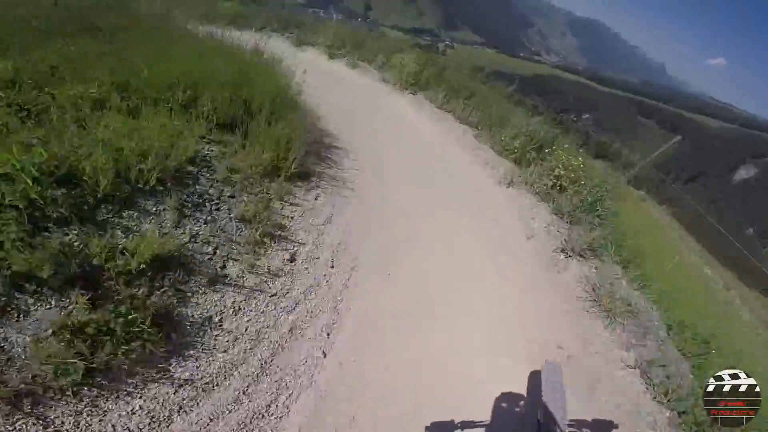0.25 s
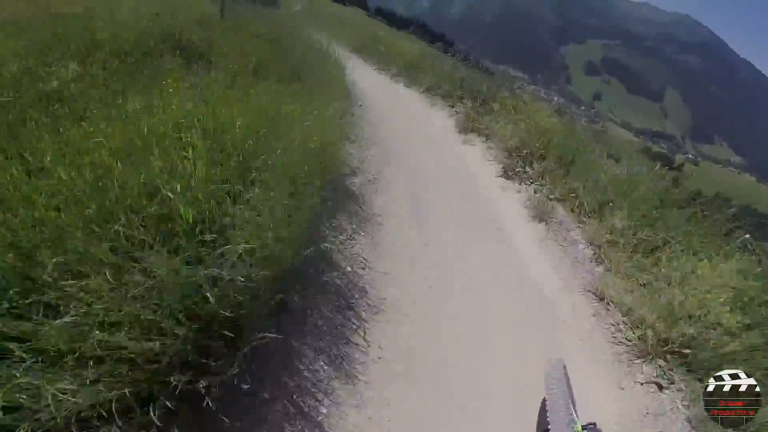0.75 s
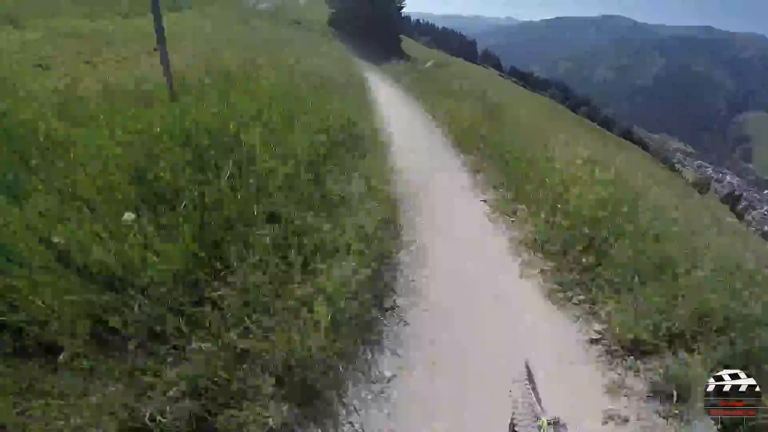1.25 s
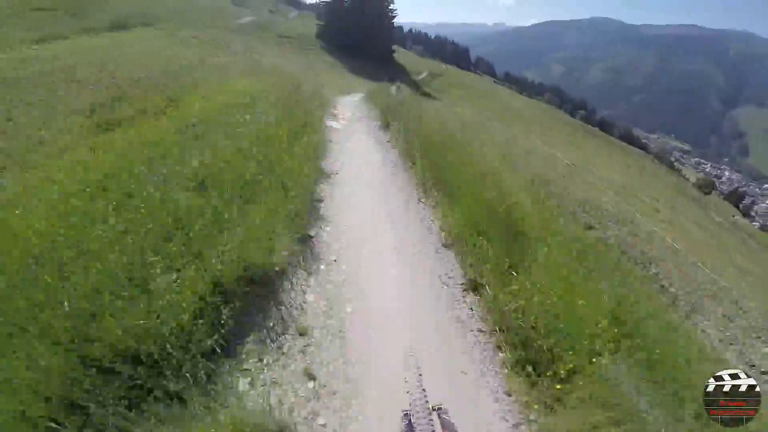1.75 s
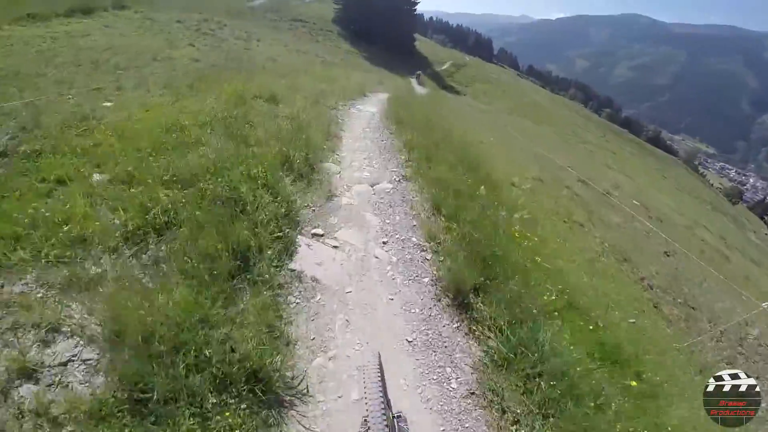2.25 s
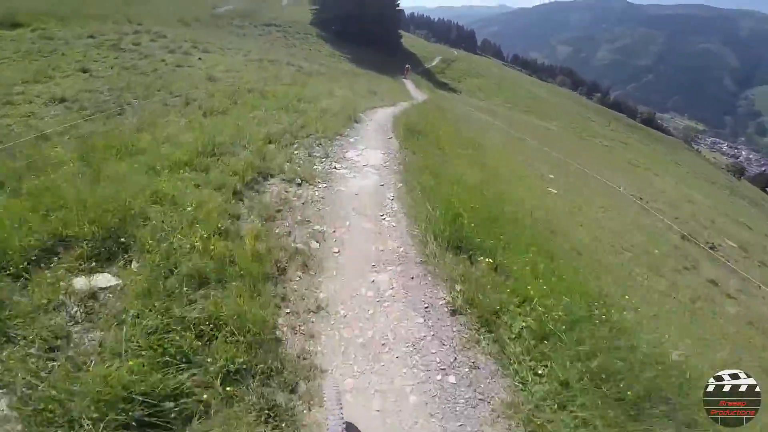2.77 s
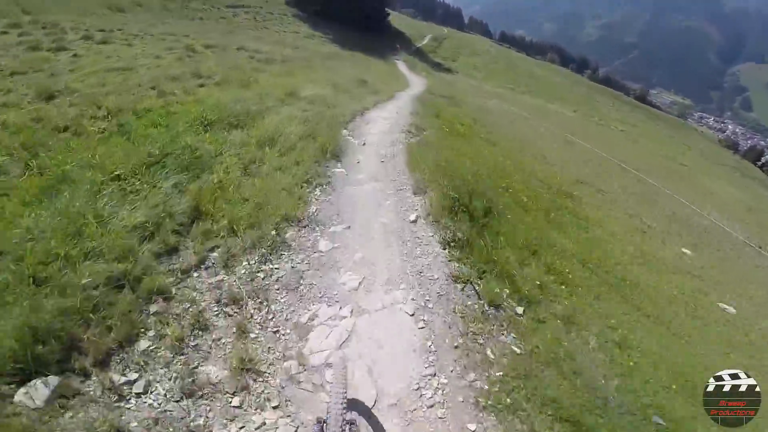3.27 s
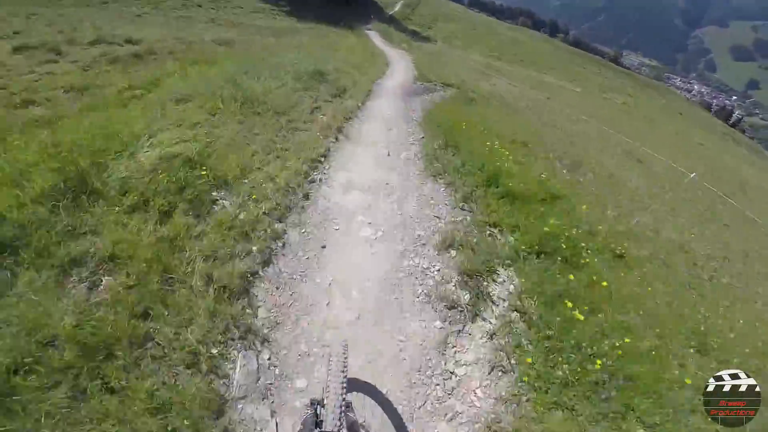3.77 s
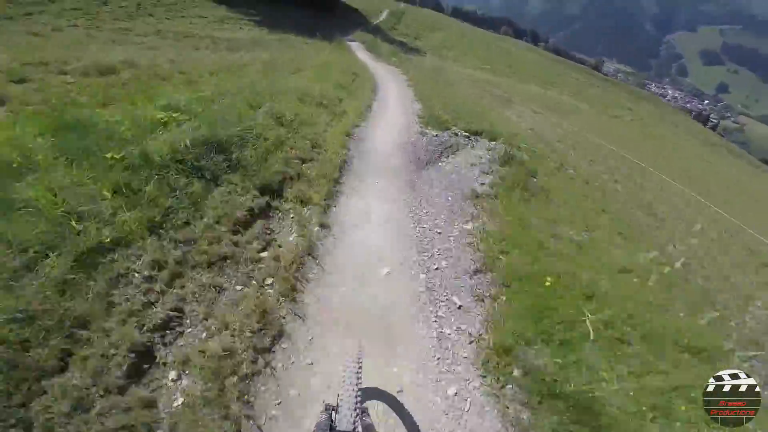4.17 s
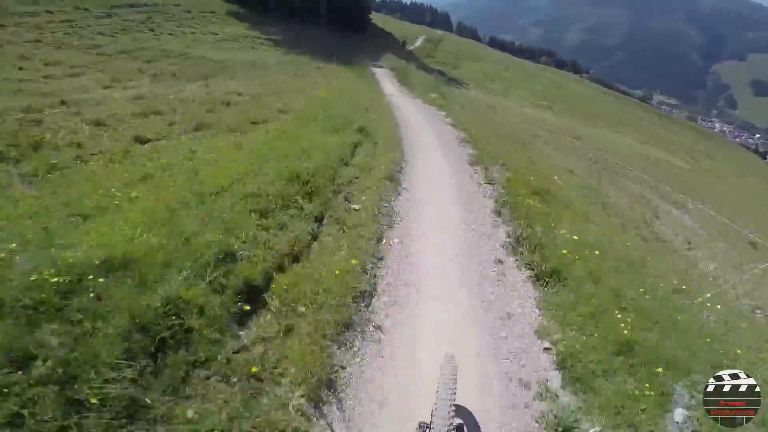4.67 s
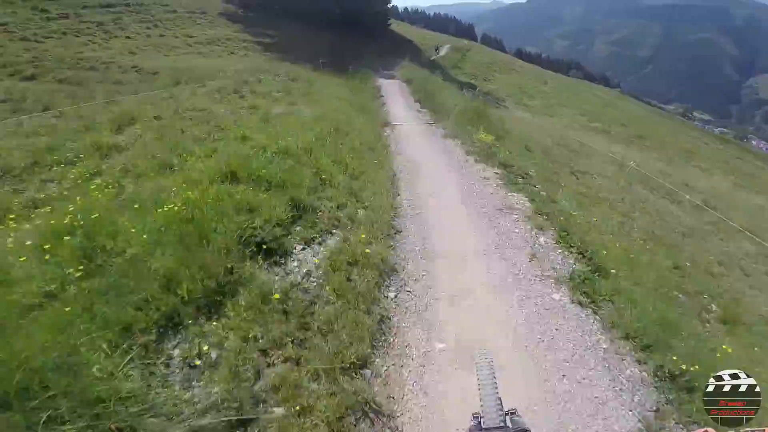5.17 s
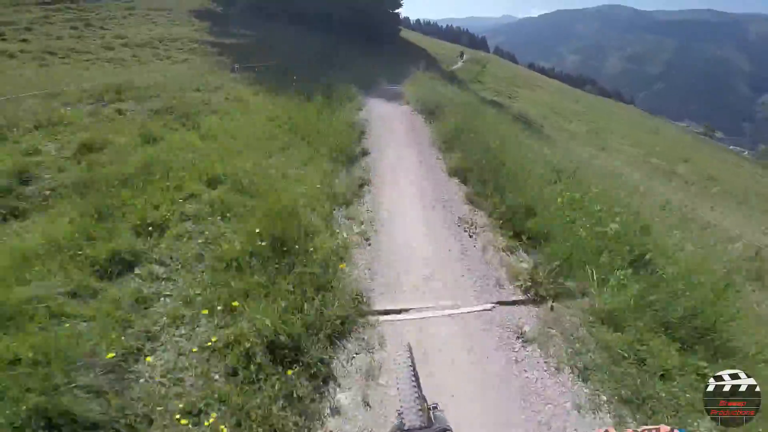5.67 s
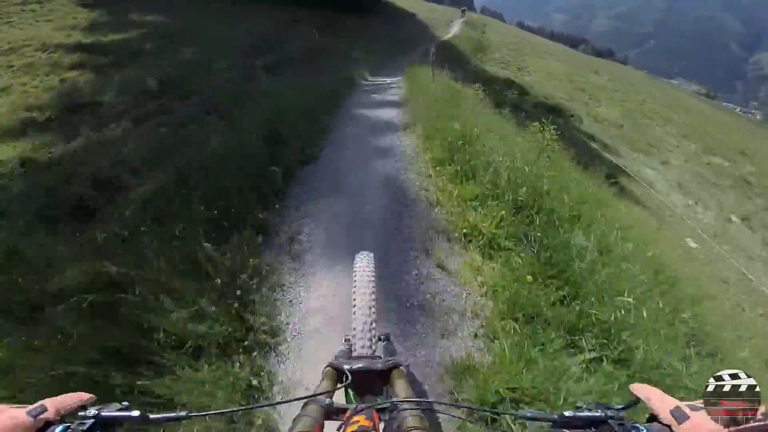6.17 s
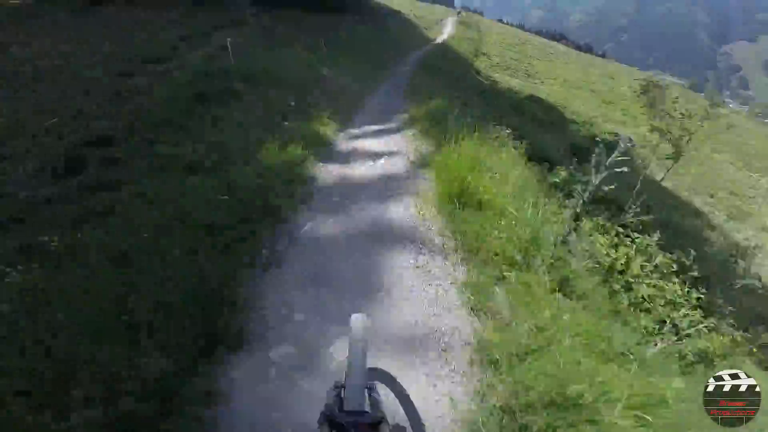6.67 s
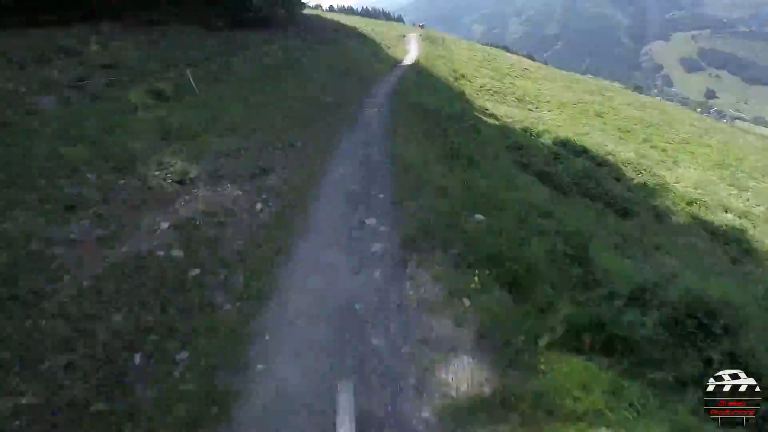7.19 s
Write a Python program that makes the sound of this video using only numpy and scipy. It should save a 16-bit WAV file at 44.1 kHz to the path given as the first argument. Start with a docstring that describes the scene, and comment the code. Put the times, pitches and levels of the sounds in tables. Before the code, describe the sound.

A mountain bike rolls quickly downhill on an open gravel path, heard close from the rider, with low wind buffeting loudest throughout. Strong flapping blasts come early, then the tyres drone briefly on hard ground. Stones knock the wheels and ping off the spokes while chain and cables click on the frame. A faint freehub buzz and steady gravel crunch run underneath, and one hard hit cracks shortly before the end.

```python
"""Wind rumbles and tears at a microphone on the rider as a mountain bike coasts fast down gravel.
Close below, the tyres hiss and crunch and briefly drone on hardpack; stones knock, crack and ping,
chain and cables click on the frame, and faint squeaks come in runs. The freehub's pawls buzz with
the wheel speed and fall silent for a moment after the bend."""
import sys
import numpy as np
from scipy import signal
from scipy.fft import rfft, irfft, next_fast_len
from scipy.io import wavfile
from scipy.ndimage import uniform_filter1d

SR = 44100
rng = np.random.default_rng(int(sys.argv[2]) if len(sys.argv) > 2 else 0)


def to_wav(s):
    """Save 16-bit WAV."""
    ch = np.atleast_2d(s).T  # columns
    pcm = np.round(np.clip(ch, -1, 1) * 32767)  # PCM
    wavfile.write(sys.argv[1], SR, pcm.astype(np.int16))


N = 327645
TIME = np.arange(N) / SR

# Levels in the tables are relative: the functions add their own gains.
# Head wind between blasts. Each row: time in seconds, large eddies in dB, turbulence in dB.
HEAD_WIND = [(0, -26, -33.5), (0.11, -29, -43), (0.17, -17.5, -30), (0.62, -22.5, -39), (1.0, -19, -34),
             (1.68, -16.5, -29.5), (1.82, -27.5, -39), (2.2, -22, -34), (2.9, -15.5, -29),
             (3.08, -19.5, -29), (3.3, -18.5, -33), (3.78, -16, -31.5), (3.97, -21.5, -34.5),
             (4.6, -16, -23), (5.05, -18.5, -31), (5.85, -17, -28), (6.28, -24.5, -40), (6.5, -16.5, -37),
             (6.77, -24, -39.5), (7.43, -18.5, -30)]
# Blasts breaking over the microphone. Each row: start and length in seconds, buffet and tear in dB.
WIND_BLASTS = [(0.155, 0.12, -23.5, -53), (0.27, 0.035, -20, -29.5), (0.345, 0.081, -16, -26),
               (0.56, 0.04, -23.5, -44), (0.69, 0.075, -19.5, -35), (0.79, 0.08, -23.5, -30.5),
               (0.905, 0.062, -18.5, -23.5), (0.985, 0.19, -21, -22), (1.19, 0.037, -24.5, -25.5),
               (1.292, 0.018, -22, -22), (1.33, 0.052, -26, -24.5), (1.455, 0.26, -28, -32.5),
               (2.285, 0.047, -22, -26.5), (3.875, 0.03, -20, -36.5), (4.03, 0.037, -22.5, -39.5),
               (4.187, 0.11, -26.5, -29), (4.355, 0.22, -41, -35.5), (5.19, 0.032, -23, -36.5),
               (5.29, 0.15, -24, -35), (5.735, 0.098, -24.5, -33), (6.535, 0.099, -19.5, -30),
               (6.666, 0.008, -15.5, -26), (7.005, 0.077, -21.5, -29), (7.215, 0.12, -21, -55)]
# Sudden gusts, from dull thumps to chirring flaps.
# Each row: middle in seconds, level in dB, pitch in Hz, half-length in seconds.
SUDDEN_GUSTS = [(0.16, -13, 101, 0.016), (0.195, -25, 404, 0.027), (0.358, -23.5, 624, 0.013),
                (0.411, -21.5, 620, 0.0048), (0.414, -15.5, 272, 0.012), (0.692, -14, 88.4, 0.016),
                (0.795, -15, 226, 0.0056), (0.944, -24, 746, 0.0045), (0.993, -27, 1104, 0.019),
                (1.033, -25, 800, 0.0046), (1.047, -42, 2350, 0.05), (1.138, -29.5, 997, 0.032),
                (1.288, -25, 1000, 0.0029), (1.2956, -12, 870, 0.0023), (1.299, -7.5, 383, 0.0035),
                (1.315, -13.5, 375, 0.011), (1.55, -26.5, 674, 0.007), (1.593, -14.5, 72, 0.019),
                (1.644, -26, 593, 0.0098), (1.665, -27, 618, 0.02), (2.293, -24.5, 640, 0.025),
                (2.317, -22, 384, 0.02), (2.338, -30, 806, 0.0097), (2.443, -37, 764, 0.0039),
                (2.635, -27.5, 454, 0.0049), (2.64, -30, 950, 0.005), (2.872, -14, 98, 0.016),
                (3.649, -41, 760, 0.019), (3.884, -13, 135, 0.009), (3.919, -11, 111, 0.011),
                (4.033, -10, 42, 0.029), (4.191, -11, 39, 0.028), (4.206, -27.5, 910, 0.0057),
                (4.363, -9, 68.6, 0.021), (5.298, -8.5, 71.8, 0.022), (5.741, -25, 580, 0.012),
                (5.76, -22.5, 765, 0.0028), (5.765, -27, 1230, 0.0064), (6.595, -21, 660, 0.0027),
                (6.669, -12, 81.4, 0.015), (6.67, -26, 1030, 0.016), (6.978, -21.5, 1026, 0.0073),
                (6.991, -28.5, 1040, 0.0026), (7.057, -11.5, 47.8, 0.033)]
# Tyres on gravel, louder when pressed into bends and dips. Each row: time in seconds, level in dB.
TYRE_LEVEL = [(0, -48), (0.3, -53.5), (0.58, -47.5), (1.12, -45.5), (1.34, -48.5), (2.0, -50.5),
              (2.45, -49.5), (2.54, -51.5), (3.3, -50.5), (3.62, -46), (3.9, -49), (5.34, -45.5),
              (5.59, -49), (5.92, -44.5), (6.1, -50), (6.48, -54), (6.66, -44.5), (6.93, -50.5),
              (7.33, -40), (7.43, -45.5)]
# Smooth, hard ground. Each row: start in seconds, length in seconds, drone level in dB.
HARD_GROUND = [(1.78, 0.53, -33.5)]
# Chain and cables on the frame. Each row: start in seconds, level in dB, frame ring offset in dB.
CHAIN_CLICKS = [(0.963, -41, -10), (1.074, -43, -3), (1.164, -53, 28.5), (1.31, -53, 29.5),
                (1.729, -42, -12), (1.8697, -45, 4), (2.0383, -51, -10), (2.124, -52, -12), (2.694, -43, 5),
                (3.429, -41.5, -3), (3.478, -42.5, 8), (3.539, -56, -11), (3.581, -44, 7),
                (3.6123, -47, 11), (3.738, -47, 4), (3.8097, -46.5, 5), (3.845, -48, 12), (4.169, -41.5, 1),
                (4.3137, -45, 10), (5.968, -49, -8), (6.124, -45.5, -21), (6.542, -32.5, 5), (6.58, -38, 5),
                (6.606, -40.5, 11), (6.6273, -44, 8), (6.805, -46.5, -14)]
# Stones and ruts knocking the wheels. Each row: start in seconds, level in dB.
WHEEL_KNOCKS = [(1.684, -35), (1.796, -30.5), (2.3687, -49), (2.574, -39), (2.85, -38), (3.3324, -34),
                (3.4145, -34.5), (3.47, -31.5), (3.512, -33.5), (3.7365, -35), (3.894, -34), (3.956, -33.5),
                (4.824, -36), (4.8587, -35), (4.8825, -33), (5.3309, -33), (6.027, -33.5), (6.528, -27.5),
                (6.667, -35), (7.1928, -32)]
# Sharp cracks: the snap of the strongest gust, and hard hits on the wheels.
# Each row: start in seconds, level in dB.
SHARP_CRACKS = [(1.296, -24.5), (1.299, -27), (5.8008, -36), (6.5379, -20.5)]
# Stones flicked against spokes and frame. Each row: start in seconds, level in dB, pitch in Hz.
STONE_PINGS = [(2.3265, -46.5, 12000), (2.8226, -53, 6550), (3.3614, -54, 6200), (3.54, -43, 7030),
               (3.6125, -47, 7850), (3.669, -50, 7600), (3.712, -49, 7100), (3.8795, -48, 7450),
               (4.087, -48, 6100), (4.2425, -48, 6900)]
# Wheel speed as heard in the freehub. Each row: time in seconds, pawl clicks per second.
HUB_RATE = [(0, 71), (1.1, 75), (1.5, 79), (2.3, 51), (3, 55), (3.5, 61), (4, 69), (5, 74), (6.3, 97),
            (7.43, 103)]
# Buzz of the freehub. Each row: time in seconds, level in dB.
HUB_LEVEL = [(0, -58), (1.45, -57), (2.35, -62.5), (4.03, -60), (6.1, -65.5), (6.21, -54), (7.12, -64.5),
             (7.43, -64)]
# Runs of faint squeaking. Each row: start in seconds, length in seconds, level in dB.
SQUEAK_RUNS = [(2.6, 0.9, -58), (3.75, 0.45, -57), (5.85, 0.55, -57.5)]
# Spectra of the wind, the ground and the bike's parts. Each row: frequency in Hz, density in dB.
RUMBLE_SPECTRUM = [(8, -28), (20, -3.5), (32, 1.5), (55, -3.5), (80, -8), (120, -20), (250, -36.5),
                   (600, -82)]
BUFFET_SPECTRUM = [(40, -1), (80, -0.5), (115, 1.5), (170, -4), (260, -8.5), (400, -19.5), (800, -32.5),
                   (2500, -62)]
TEAR_SPECTRUM = [(120, -55), (260, 4.5), (360, 4), (550, -1.5), (850, -13.5), (1300, -19), (2500, -40),
                 (6000, -61)]
RASP_SPECTRUM = [(400, 15), (900, 13), (1500, -0.5), (2700, -6.5), (4000, -28), (8000, -68)]
GRAVEL_SPECTRUM = [(150, -20), (400, 8.5), (800, 7.5), (1300, 2.5), (2300, 0.5), (3000, -4.5), (4000, -8),
                   (5200, -14.5), (7000, -19), (9000, -24), (12000, -23), (15500, -34)]
STEEL_SPECTRUM = [(2000, -27), (4400, 4.5), (5200, 5), (6000, 3.5), (6900, 5), (7400, -3), (7800, 2),
                  (8800, -2), (11000, 0.5), (13500, 0), (15500, -6)]
FRAME_SPECTRUM = [(800, -42), (2200, 17), (3500, 10), (6500, -19.5), (9000, -19), (15000, -32)]
KNOCK_SPECTRUM = [(300, -1.5), (900, 12), (1700, 9.5), (2300, 8), (3200, -2.5), (5000, -14), (8000, -22),
                  (15000, -27)]
PAWL_SPECTRUM = [(2000, -50), (4500, -16), (5180, -9), (5700, -16.5), (8700, -16.5), (10000, -14.5),
                 (12200, -13.5), (12900, -2.5), (13450, -2), (14200, -16), (15500, -12)]


def wind(level_db=-1, rasp_db=-39, lump_db=4, heave_db=1.5, attack_s=0.016, release_s=0.015):
    """Large eddies push on the microphone port; small ones break off their crests and rasp when strong."""
    turbulence_db = follow(HEAD_WIND, column=2)
    buffet_blast = swells(WIND_BLASTS, attack_s, release_s)
    tear_blast = swells(WIND_BLASTS, attack_s, release_s, column=3)
    eddy_gain = np.hypot(amp(follow(HEAD_WIND) + heave_db * flutter(14)), buffet_blast)
    buffet_gain = np.hypot(amp(turbulence_db), buffet_blast)
    faint_tear_db = -48 + 0.99 * (turbulence_db + 31.5)  # the head wind tears more as it grows turbulent
    tear_gain = np.hypot(amp(faint_tear_db), tear_blast)
    rasp_gain = amp(rasp_db) * (tear_gain / amp(-27)) ** 2.28  # climbs steeply in strong flow
    eddies = steady(noise(RUMBLE_SPECTRUM), size=2800)
    crests = np.sqrt(0.31 + 0.69 * eddies ** 2)
    buffet = steady(noise(BUFFET_SPECTRUM) * crests, size=2000)
    tear = steady(noise(TEAR_SPECTRUM) * crests * amp(lump_db * flutter(25)), size=1600)
    rasp = steady(noise(RASP_SPECTRUM) * crests * amp(lump_db * flutter(110)), size=1600)
    body = eddies * eddy_gain + buffet * buffet_gain + tear * tear_gain
    return amp(level_db) * body + rasp * rasp_gain


def gusts(level_db=-1, wander=0.13, rise=0.15, width_octaves=0.36, size=6000):
    """Each gust sheds a quickening run of vortices at the microphone; longer runs break up more."""
    out = np.zeros(N)
    t = (np.arange(size) - size / 2) / SR
    bin_hz = np.fft.rfftfreq(size, 1 / SR) + 1
    for middle, db, hz, half_length in SUDDEN_GUSTS:
        jitter, spray = rng.standard_normal((2, size))
        drift = unit(signal.fftconvolve(jitter, signal.windows.hann(int(2 * SR / hz)), "same"))
        shedding_hz = hz * (1 + wander * drift + rise * np.tanh(t / half_length))
        phase = 2 * np.pi * np.cumsum(shedding_hz) / SR
        phase -= phase[size // 2]  # the hardest push comes in the middle
        steepness = 0.36 / (1 + (hz / 300) ** 2)  # large, slow vortices have the steepest crests
        vortices = unit(sum(steepness ** k * np.cos((k + 1) * phase) for k in range(4)))
        band = np.exp(-0.5 * (np.log2(bin_hz / hz) / width_octaves) ** 2)
        broken = unit(irfft(rfft(spray) * band, size))
        swell = np.exp(-2 * (t / half_length) ** 2)
        gust = swell * (vortices + np.sqrt(hz * half_length / 6) * broken)  # equal parts at six cycles
        gust *= np.linalg.norm(swell) / np.linalg.norm(gust)
        add(out, middle + t[0], amp(db + level_db) * gust)
    return out


def tyres(hiss_db=1.15, crunch_db=-3.5, bump_db=1.56):
    """Below the rider, knobs crush fine grit while bumps vary the load."""
    load = amp(bump_db * flutter(46))
    crunch = unit(colour(grains(per_s=1100, spread_db=5.5), GRAVEL_SPECTRUM))
    hiss = noise(GRAVEL_SPECTRUM)
    return (amp(hiss_db) * hiss + amp(crunch_db) * crunch) * load * amp(follow(TYRE_LEVEL))


def tread(drone_hz=140, waver=0.213, uneven_db=2):
    """The knobs slap the hard ground in a low, unsteady drone."""
    phase = 2 * np.pi * np.cumsum(drone_hz * (1 + waver * flutter(44.6))) / SR
    drone = unit(np.sin(phase) * amp(uneven_db * flutter(25)))
    return drone * swells(HARD_GROUND, attack_s=0.086, release_s=0.08)


def rattle(click_db=-4, frame_db=-8, knock_db=-4):
    """Steel clicks, the frame rings duller, the wheels knock; hard hits and the strongest gust crack."""
    out = np.zeros(N)
    for start, db, ring_db in CHAIN_CLICKS:
        add(out, start, amp(db + click_db) * strike(STEEL_SPECTRUM, rise_s=0.0025, t60_s=0.03))
        frame_ring = strike(FRAME_SPECTRUM, rise_s=0.0013, t60_s=0.051)
        add(out, start, amp(db + ring_db + frame_db) * frame_ring)
    for start, db in WHEEL_KNOCKS:
        add(out, start, amp(db + knock_db) * strike(KNOCK_SPECTRUM, rise_s=0.002, t60_s=0.042))
    for start, db in SHARP_CRACKS:
        add(out, start, amp(db) * strike(KNOCK_SPECTRUM, rise_s=0.00034, t60_s=0.008))
    return out


def stone_pings(ring_db=-3, tick_db=-5, t60_s=0.047):
    """A stone gives a sharp tick, and the part it hits rings briefly at its own pitch."""
    out = np.zeros(N)
    for start, db, hz in STONE_PINGS:
        tick = strike([(hz / 4, -9), (hz, 0), (2 * hz, -13)], rise_s=0.0008, t60_s=0.046)
        t = np.arange(len(tick)) / SR
        ring = np.sin(2 * np.pi * hz * t) * amp(-60 * t / t60_s)
        add(out, start, amp(db + ring_db) * ring + amp(db + tick_db) * tick)
    return out


def freehub(ring_s=0.0052, uneven_db=2, fades_at_s=1.46, resumes_s=2.32, fade_db_per_s=49):
    """A pawl drops off each tooth and chatters in the hub; the buzz fades once and snaps back."""
    rate = follow(HUB_RATE)
    teeth_passed = np.cumsum(rate * (1 + 0.048 * flutter(40))) / SR
    since_tooth_s = (teeth_passed % 1) / rate
    chatter = grains(per_s=2500, spread_db=2) + 0.93 * rng.standard_normal(N)
    drops = np.exp(-since_tooth_s / ring_s) * chatter * amp(uneven_db * flutter(67))
    pause_db = -fade_db_per_s * np.maximum(TIME - fades_at_s, 0) * (TIME < resumes_s)
    return unit(colour(drops, PAWL_SPECTRUM)) * amp(follow(HUB_LEVEL) + pause_db)


def squeaks(top_hz=5330, scatter_hz=100, scratch_hz=1500, fall_hz_per_s=22000, uneven_db=2):
    """Faint runs of tiny, scratchy, falling squeaks, perhaps a brake disc brushing its pad."""
    chirp_s, spacing_s = 0.017, 0.027
    out = np.zeros(N)
    t = np.arange(0, chirp_s, 1 / SR)
    for start, length, db in SQUEAK_RUNS:
        for onset in np.arange(start, start + length, spacing_s):
            late, pitch, strength = rng.standard_normal(3)
            hz = top_hz + scatter_hz * pitch - fall_hz_per_s * t + scratch_hz * rng.standard_normal(len(t))
            chirp = np.sin(2 * np.pi * np.cumsum(hz) / SR) * np.sin(np.pi * t / chirp_s) ** 2
            add(out, onset + late * spacing_s / 6, amp(db + uneven_db * strength) * chirp)
    return out


def strike(spectrum, rise_s, t60_s, size=6000):
    """A short noise burst, like a blow on a part with many close modes; its loudest 2 ms have rms one."""
    t = np.arange(size) / SR
    burst = rng.standard_normal(size) * (1 - np.exp(-t / rise_s)) * amp(-60 * t / t60_s)
    ring = colour(burst, spectrum, size=1024)
    return ring / np.sqrt(uniform_filter1d(ring ** 2, 88).max())


def grains(per_s, spread_db):
    """Random impacts, mostly small, a few large."""
    impacts = amp(spread_db * np.minimum(rng.exponential(1, N), 4)) * rng.choice([-1, 1], N)
    return impacts * (rng.random(N) < per_s / SR)


def swells(rows, attack_s, release_s, column=2):
    """Gain of events that swell up to their start, hold for their length and die away; powers add."""
    power = np.zeros(N)
    for row in rows:
        start, length = row[:2]
        t = np.arange(-4 * attack_s, length + 6 * release_s, 1 / SR)
        shape = np.exp(-(np.minimum(t, 0) / attack_s) ** 2 - np.maximum(t - length, 0) / release_s)
        add(power, start + t[0], (amp(row[column]) * shape) ** 2)
    return np.sqrt(power)


def colour(x, spectrum, size=4096):
    """Passes x through a causal filter with the given spectrum."""
    log_gain = np.log(spectrum_gain(spectrum, np.fft.fftfreq(size, 1 / SR)))
    taps = np.fft.ifft(np.exp(np.conj(signal.hilbert(log_gain)))).real  # minimum phase
    return signal.fftconvolve(x, taps[:size // 2])[:len(x)]


def noise(spectrum):
    """Even noise with the given spectrum and an rms of one."""
    size = next_fast_len(N)
    gain = spectrum_gain(spectrum, np.fft.rfftfreq(size, 1 / SR))
    return unit(irfft(rfft(rng.standard_normal(size)) * gain, size)[:N])


def spectrum_gain(spectrum, bin_hz):
    """Gain of a spectrum at each bin, interpolated over log frequency."""
    hz, db = np.transpose(spectrum)
    return amp(np.interp(np.log(abs(bin_hz) + 1), np.log(hz), db))


def flutter(hz, step=32):
    """Random wavering of unit size, up to about hz."""
    size = N // step + 2
    gain = np.exp(-(np.fft.rfftfreq(size, step / SR) / hz) ** 2)
    coarse = unit(irfft(rfft(rng.standard_normal(size)) * gain, size))
    return np.interp(np.arange(N) / step, np.arange(size), coarse)


def steady(x, size):
    """Holds the power constant over spans of size samples; faster lumps stay."""
    power = uniform_filter1d(uniform_filter1d(x ** 2, size), size)
    return x / np.sqrt(abs(power) + 1e-12)


def follow(rows, column=1):
    """One column of a curve at every sample."""
    rows = np.asarray(rows)
    return np.interp(TIME, rows[:, 0], rows[:, column])


def add(mix, start_s, sound):
    """Mixes a sound in at start_s."""
    part = mix[max(round(start_s * SR), 0):][:len(sound)]
    part += sound[:len(part)]


def amp(db):
    """Decibels to gain."""
    return 10 ** (np.asarray(db) / 20)


def unit(x):
    """Scales to an rms of one."""
    return x / np.sqrt(np.mean(x ** 2) + 1e-20)


def scene():
    """Open hillside, one microphone on the rider: every source is close and dry."""
    return (wind() + gusts() + tyres() + tread() + freehub() + rattle() + stone_pings() + squeaks())[None]


def record(dry, ceiling=0.88, cutoff_hz=15400):
    """The microphone rounds off the strongest pushes, and the highest treble is cut."""
    rounded = ceiling * np.tanh(dry / ceiling)
    lowpass = signal.firwin(511, cutoff_hz, window=("kaiser", 9), fs=SR)
    return signal.oaconvolve(rounded, lowpass[None], "same")


dry = scene()
out = record(dry)
to_wav(out)
```